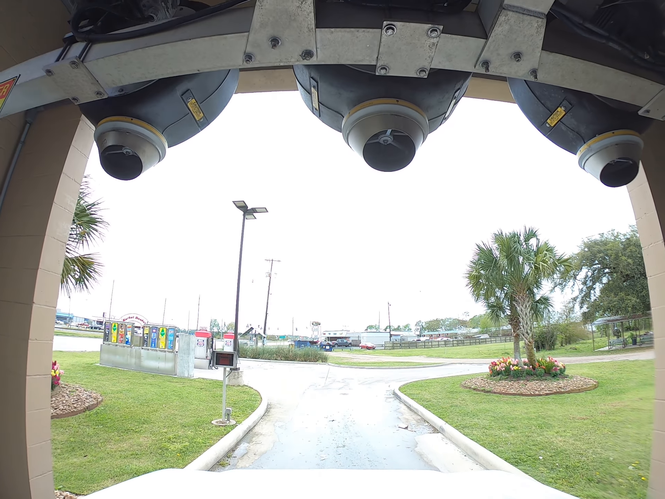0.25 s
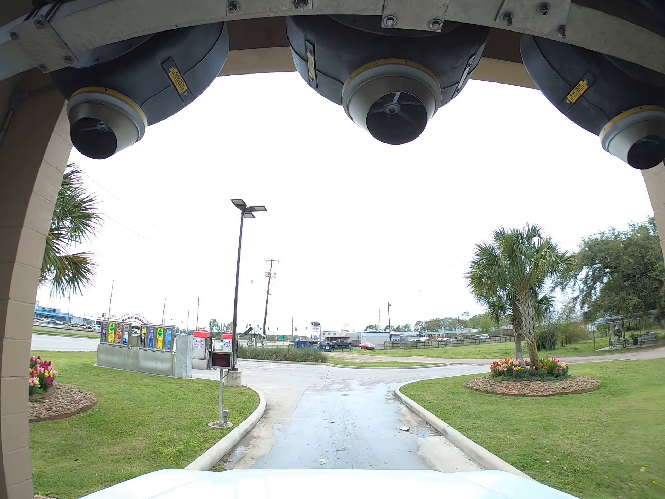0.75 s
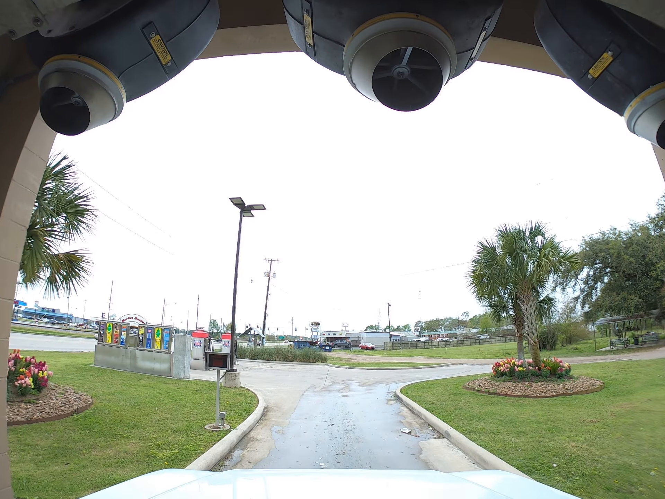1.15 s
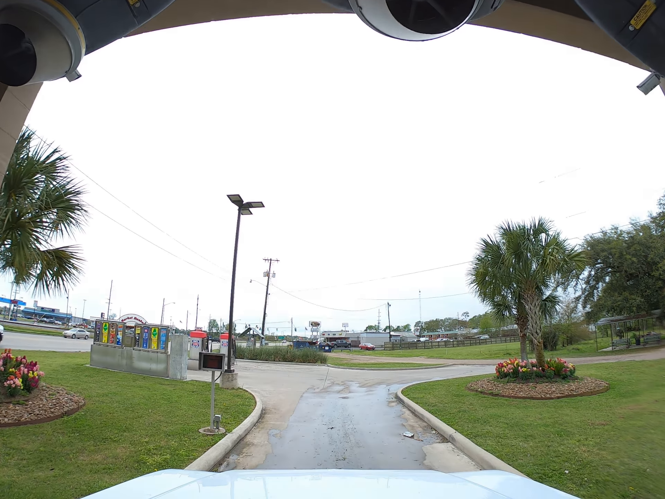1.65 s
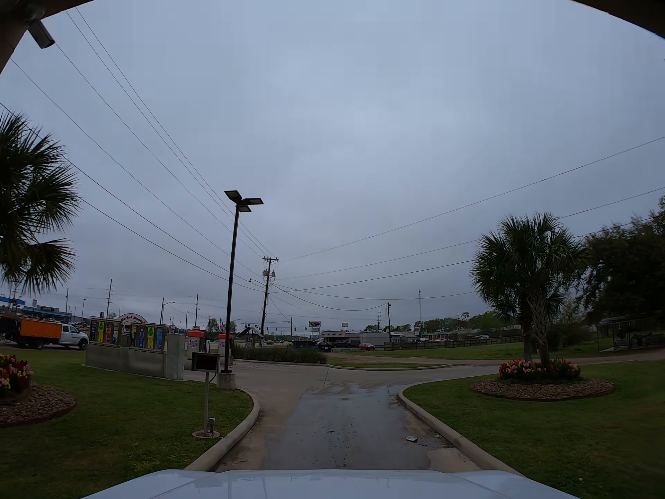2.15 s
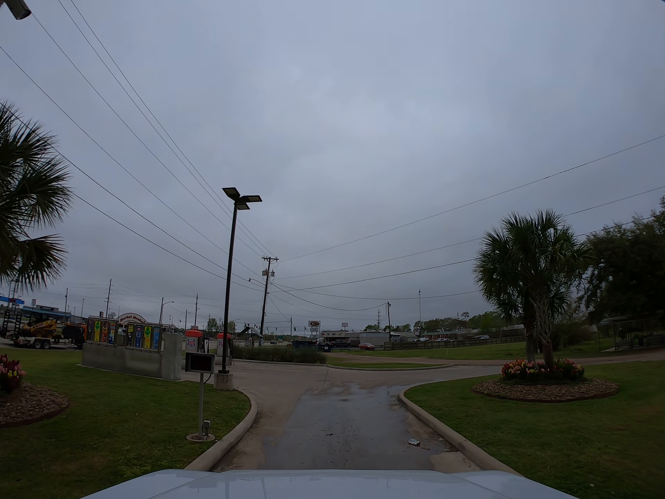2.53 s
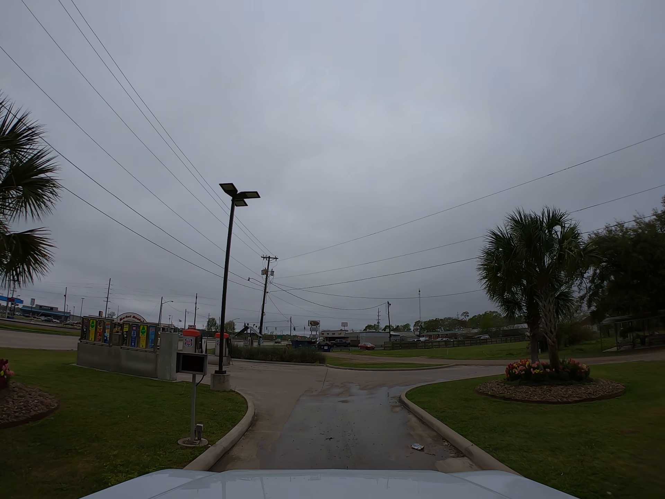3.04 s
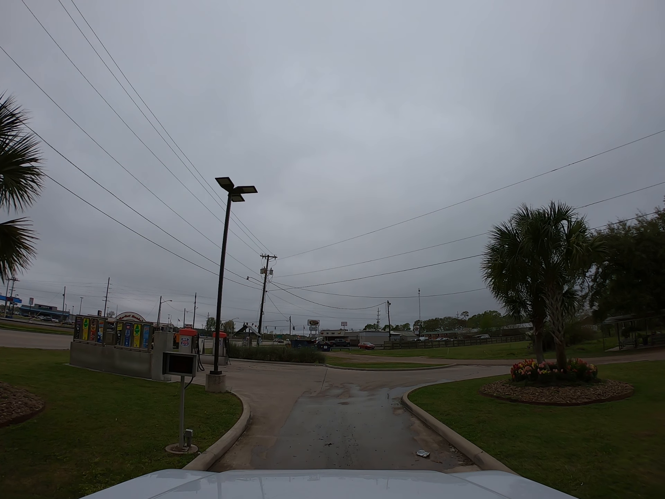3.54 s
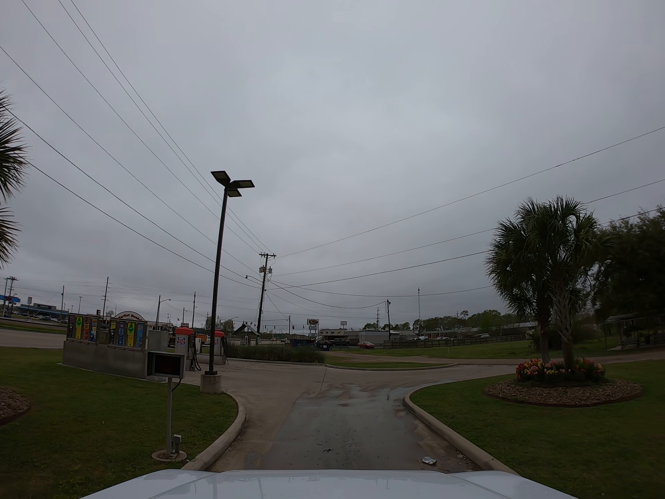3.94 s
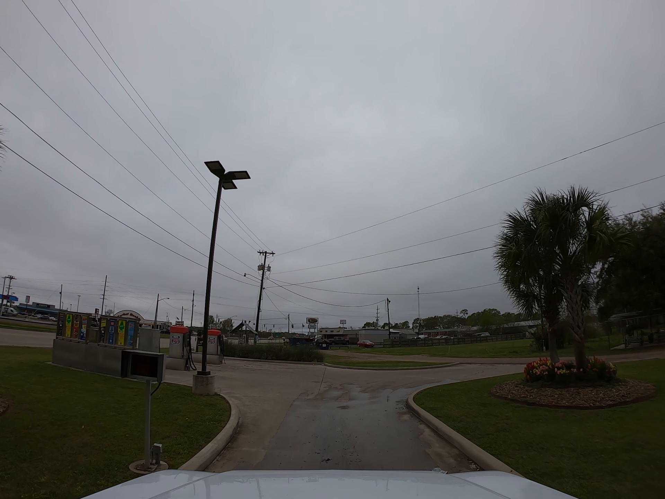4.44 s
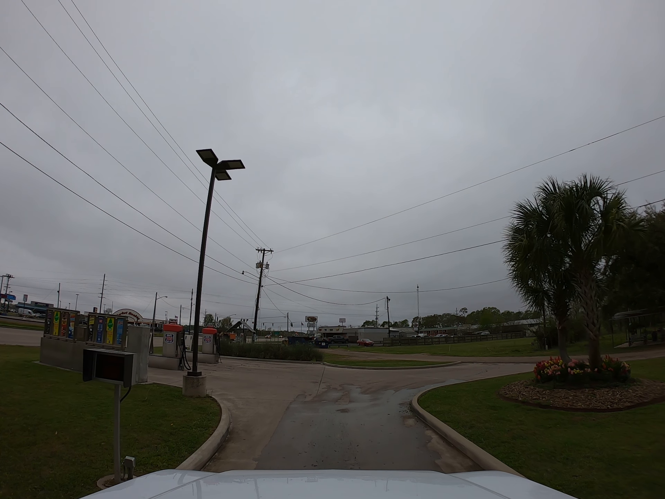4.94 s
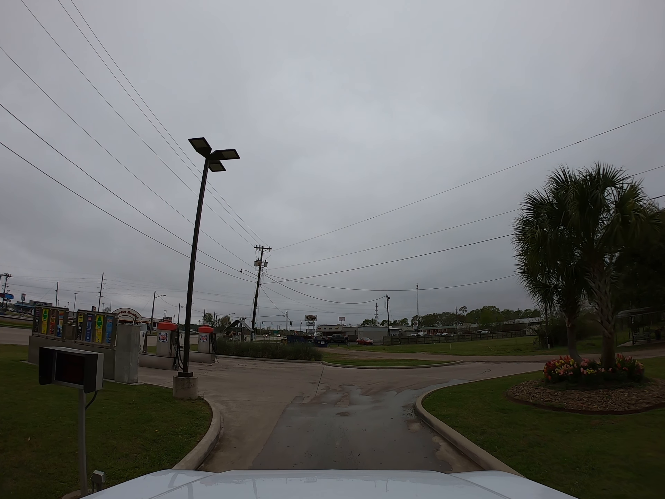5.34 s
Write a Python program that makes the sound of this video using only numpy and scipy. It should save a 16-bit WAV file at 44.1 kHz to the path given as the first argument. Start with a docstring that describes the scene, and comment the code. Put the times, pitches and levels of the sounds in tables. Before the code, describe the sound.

A car rolls slowly out from under car wash blowers, with the microphone in the cabin. Fluttering air beats on the roof and whines, surges once, then gradually dies down. Three soft knocks sound through the body, the last two during a low blower hum that rises and falls. Drops tick on the glass throughout, over the idling engine and the body's rumble, which are left as the air recedes.

```python
"""One microphone inside a car, close to the glass, rolling slowly out from under a car wash's air blowers.
At first the turbulent jets drum on the roof just overhead and rush past the windows, whining in narrow
resonances. A soft knock comes through the body at 1.5 s; near 2 s the rush surges as the car clears the
last jets, then grows duller. From 2.6 to 4 s a blower tone swells and fades, with two more knocks.
The idling engine, the body's rumble and drops ticking on the glass, there all along, remain at the end."""
import sys
import numpy as np
from scipy import signal
from scipy.fft import rfft, irfft, next_fast_len
from scipy.io import wavfile
from scipy.ndimage import uniform_filter1d, map_coordinates

SR = 44100
rng = np.random.default_rng(int(sys.argv[2]) if len(sys.argv) > 2 else 0)


def store_pcm(level_fs):
    """Save levels as 16-bit WAV."""
    pcm = np.round(np.clip(level_fs, -1, 1) * 32767).astype(np.int16)
    wavfile.write(sys.argv[1], SR, np.atleast_2d(pcm).T)


N = 246078

# Colours of the noises, low to high: (frequency [Hz], relative spectral density [dB])
RUMBLE_SPECTRUM = [(7.1, -45), (12, -14), (27, -4), (70, -4), (113, -3), (140, -13.5), (172, -16.5),
                   (217, -9.5), (260, -38), (340, -71), (570, -120)]
BOOM_SPECTRUM = [(90, -41), (125, -4), (155, 2), (190, 2), (222, -5), (250, -7.5), (300, -42)]
DRUMMING_SPECTRUM = [(190, -32), (250, 1.5), (300, 2.5), (360, -4.5), (415, 0), (500, -10.5), (700, -34.5)]
RUSH_SPECTRUM = [(350, -43.5), (480, -3.5), (620, -5.5), (760, -3), (880, -1.5), (1000, -2.5),
                 (1150, -12.5), (1500, -48)]
UPPER_RUSH_SPECTRUM = [(850, -26), (1080, -2.5), (1260, -2), (1450, -8), (1700, -15.5), (2100, -48)]
HISS_SPECTRUM = [(1400, -32), (1750, 1.5), (2080, 0.5), (2430, -6), (2960, -1.5), (3600, -7), (4200, -12.5),
                 (5000, -25), (6500, -54.5)]
FIZZ_SPECTRUM = [(3800, -25), (4600, -4.5), (5400, -7), (6300, -4), (7000, 0), (7900, -5.5), (9900, -8),
                 (10700, -15), (12300, -18.5), (13300, -29.5), (14400, -32.5), (16000, -44)]
MIC_HISS_SPECTRUM = [(11500, -25), (13000, -6), (14300, 0), (16000, 0)]
# The same noises over time, before flutter and surge: (time [s], level [dB])
RUMBLE_LEVEL = [(0, -30), (.6, -27), (1.2, -30.5), (1.83, -33.5), (2.4, -33.5), (3.2, -30), (3.7, -29),
                (4.2, -27.5), (4.6, -30), (5.1, -32), (5.4, -26.5), (5.58, -26.5)]
BOOM_LEVEL = [(0, -30.5), (.2, -23), (1.44, -23.5), (1.57, -30.5), (2.4, -30), (2.65, -29), (2.9, -32),
              (3.2, -31), (3.45, -27.5), (3.85, -35.5), (4.8, -36), (5.1, -32), (5.58, -34)]
DRUMMING_LEVEL = [(0, -27), (1.4, -30.5), (1.6, -34), (2.4, -35), (3.1, -38), (3.7, -41.5), (4.05, -42.5),
                  (4.4, -40), (4.9, -43), (5.58, -40.5)]
RUSH_LEVEL = [(0, -29), (1.1, -29.5), (1.5, -32), (2.45, -34.5), (2.9, -37), (3.6, -41.5), (4.05, -42),
              (4.4, -39.5), (4.9, -41), (5.58, -42)]
UPPER_RUSH_LEVEL = [(0, -40), (1, -42.5), (1.6, -43.5), (2.2, -43), (2.6, -47), (3.4, -48.5), (4.3, -48),
                    (5, -47.5), (5.58, -50)]
HISS_LEVEL = [(0.0, -48.5), (1.13, -51), (2.02, -50.5), (2.5, -52.5), (3.39, -56), (4.4, -58.5),
              (5.58, -61.5)]
FIZZ_LEVEL = [(0.0, -61), (2.04, -61), (2.24, -63), (3.88, -63.5), (5.58, -70.5)]
MIC_HISS_LEVEL = [(.6, -97.5), (1.1, -92), (1.6, -98), (2.6, -98), (3.2, -85.5), (3.8, -88.5), (4.3, -79),
                  (5.35, -80), (5.58, -95.5)]
# The engine's firing tone and the blower tone, heard from the cabin: (time [s], level [dB])
FIRING_LEVEL = [(0, -42.5), (1.1, -33.5), (1.75, -40), (2.6, -36), (4.2, -34.5), (4.7, -32.5),
                (5.42, -32.5), (5.58, -42)]
BLOWER_LEVEL = [(0, -32), (1.4, -47), (2.2, -36), (2.52, -37.5), (2.6, -25), (2.8, -29), (2.95, -31),
                (3.1, -31.5), (3.25, -25.5), (3.45, -24), (3.6, -28.5), (3.8, -28.5), (3.95, -44.5),
                (5.58, -36.5)]
# Thin sizzles and rough squeaks: (time [s], half length [s], level [dB], centre [Hz], width [Hz])
SIZZLES = [(5.22, 0.083, -66, 3000, 500), (4.7, 0.8, -63.5, 2010, 300), (3.022, .008, -49.5, 1900, 200),
           (3.04, .013, -47.5, 2170, 260), (3.085, 0.021, -56, 2150, 200), (5.152, 0.0067, -53, 2900, 900)]
# Drops, before their colouring: # (time [s], level [dB], pitch [Hz], bright part [dB re tick], pane ring [dB re
# tick])
DROPS = [(.123, -34, 4200, -2, -7), (.176, -31.5, 3000, -15, -9), (.497, -35, 3800, -12, -8),
         (.839, -29.5, 3000, -1, -9), (1.479, -35, 3950, -10, -7), (1.5554, -30.5, 3470, -25, -13),
         (1.6642, -28.5, 2850, -2, -4), (1.948, -31.5, 3500, -9, -10), (2.1435, -41, 4520, 7, -9),
         (2.1876, -40, 4430, 8.5, -7), (2.37, -35, 3150, -20, -11), (2.6794, -38, 2885, -23, -13),
         (3.3519, -31.5, 2560, -6, -8), (3.5823, -29.5, 2920, -24, -12), (3.6544, -40, 2220, -23, -6),
         (3.804, -35, 2850, -8, -12), (3.9779, -26.5, 2870, -6, -18), (4.244, -39, 2000, -25, 1),
         (4.322, -43, 2700, -25, -9), (4.388, -41, 2700, -25, -12), (4.396, -44, 3200, -23, -12),
         (4.588, -39, 3200, -20, -12), (4.789, -41, 3800, -17, -12), (4.898, -35.5, 1800, -28, -2),
         (4.9676, -31.5, 2400, -23, -4), (5.022, -46, 2900, -14, -3), (5.1411, -24, 2550, -16, -3),
         (5.1492, -34, 2900, -6, -6), (5.2844, -42, 3000, -20, -12), (5.296, -41, 3000, -25, -12),
         (5.369, -45, 3000, -8, -9), (5.385, -45, 2500, -25, -9), (5.467, -39, 2400, -8, -1),
         (5.4897, -32.5, 2570, -30, -12), (5.5503, -36, 2800, -20, -5), (5.556, -45, 3200, -2, -12)]
# Colour of a drop as heard in the cabin: (frequency [Hz], gain [dB])
DROP_COLOUR = [(500, 2.5), (3900, -1), (4700, -9.5), (5400, -5), (6500, -1), (7500, -6), (9000, -7),
               (16000, -3)]
# Knocks on the body: (time [s], level [dB], pitch [Hz], ring [cycles], thud [dB re blow], thud pitch [Hz])
KNOCKS = [(1.4545, -11, 720, 1, -6, 370), (2.667, -14, 440, 0.94, -4, 205),
          (3.559, -19.5, 585, 0.6, -1.5, 295)]
# Strength of the jets that drive the whines: (time [s], level [dB])
JET_STRENGTH = [(0.0, -26), (0.9, -28.5), (1.4, -32.5), (1.86, -32), (2.42, -34.5), (3.67, -39),
                (4.37, -41.5), (5.25, -45), (5.58, -38.5)]
# Resonances in the rush: (centre [Hz], level at mean jet strength [dB], slope [dB per dB of strength])
WHINES = [(220.4, -40.5, 1.01), (735.4, -50.5, 1), (853, -51.5, 1.4), (930, -49.5, 1.15)]
# Moments when one whine stands out: (row of WHINES, time [s], half length [s], rise [dB])
WHINE_SWELLS = [(0, 0.52, 0.1, 1), (0, 1.39, 0.14, 11), (0, 3.3, 0.73, 3.5), (1, 1.163, 0.055, 17),
                (1, 2.8, 0.42, 7), (2, 1.68, 0.2, 7.5), (2, 2.4, 0.15, 14), (3, 1.01, 0.06, 10),
                (3, 2.04, 0.05, 13), (2, 2.09, 0.066, 11), (1, 2.02, .08, 6), (3, 1.83, .06, 8),
                (3, 3.2, 0.21, 10.5), (3, 4.0, 0.23, 12)]


def amp(db):
    """Gain of a level in dB."""
    return 10 ** (np.asarray(db) / 20)


def unit(x):
    """Scaled to rms 1."""
    return x / np.sqrt(np.mean(x ** 2) + 1e-20)


def curve(rows):
    """A (time, level) table as one level per sample."""
    return np.interp(np.arange(N) / SR, *np.transpose(rows))


def wobble(rate):
    """A smooth random curve, rate knots a second."""
    return map_coordinates(rng.standard_normal(int(N * rate / SR) + 4), [np.arange(N) * rate / SR])


def bump(at_s, half_s):
    """A bell of height 1 in time."""
    return np.exp(-((np.arange(N) / SR - at_s) / half_s) ** 2)


def filtered(x, response):
    """x through a gain that depends on frequency."""
    size = next_fast_len(N + 8192)
    return irfft(rfft(x, size) * response(np.fft.rfftfreq(size, 1 / SR)), size)[..., :N]


def coloured(x, spectrum, outside_db=None):
    """x through a (frequency, gain) table, read on a log frequency axis."""
    f, db = np.transpose(spectrum)
    return filtered(x, lambda hz: amp(np.interp(np.log(hz + 1), np.log(f + 1), db, outside_db, outside_db)))


def noise(spectrum, patchy_db):
    """Coloured noise of rms 1 with patches of random gain in time and frequency."""
    cells = signal.stft(rng.standard_normal(N), nperseg=512)[2]
    patches = uniform_filter1d(rng.standard_normal(cells.shape), size=5, axis=0)
    patches = unit(uniform_filter1d(patches, size=10, axis=1))
    patchy = signal.istft(cells * amp(patchy_db * patches), nperseg=512)[1][:N]
    return unit(coloured(patchy, spectrum, outside_db=-120))


def tone(hz, db, phase_drift):
    """A sine of rms level db whose phase wanders."""
    return np.sqrt(2) * amp(db) * np.sin(2 * np.pi * hz * np.arange(N) / SR + phase_drift)


def blip(t, hz, cycles):
    """A struck thing that rings for only a few cycles, with a soft start."""
    age = t * hz / cycles
    return age ** 2 * np.exp(2 - 2 * age) * np.sin(2 * np.pi * hz * t)


def mic_hiss():
    """The microphone's own faint, very high hiss."""
    return amp(curve(MIC_HISS_LEVEL)) * noise(MIC_HISS_SPECTRUM, patchy_db=0.5)


def rumble():
    """Low rumble through the car's body."""
    return amp(curve(RUMBLE_LEVEL) + 0.8 * wobble(5.5)) * noise(RUMBLE_SPECTRUM, patchy_db=0.5)


def engine(firing_hz=32.6, octave_db=-1):
    """The idling engine, heard from the cabin: its firing rate and the octave drift together."""
    level_db = curve(FIRING_LEVEL)
    drift = 0.19 * wobble(3.7)
    octave = tone(2 * firing_hz, level_db + octave_db + 3 * wobble(2.7), 2 * drift + 0.93 * wobble(12))
    return tone(firing_hz, level_db + 1.7 * wobble(1.44), drift) + octave


def blower(pitch_hz=168.5):
    """A blower outside the car: one tone that wavers in level and phase."""
    return tone(pitch_hz, curve(BLOWER_LEVEL) + 0.66 * wobble(7), 0.22 * wobble(9))


def sizzles():
    """Faint, narrow bands of hiss that come and go."""
    out = np.zeros(N)
    for at_s, half_s, db, centre_hz, width_hz in SIZZLES:
        band = filtered(rng.standard_normal(N), lambda hz: np.exp(-2 * ((hz - centre_hz) / width_hz) ** 2))
        out += amp(db) * bump(at_s, half_s) * unit(band)
    return out


def drops(pane_hz=1576, patter_per_s=12, softest_db=-53, patter_hz=3000):
    """Water on the glass close by: each drop ticks and rings the pane; small ones patter at random."""
    out, t = np.zeros(N + SR), np.arange(SR // 50) / SR
    patter = [(when * N / SR, softest_db + 8 * force, patter_hz * 2 ** (0.73 * (pitch - 0.5)), -18, -10)
              for when, force, pitch in rng.random((round(patter_per_s * N / SR), 3))]
    for at_s, db, hz, bright_db, pane_db in DROPS + patter:
        tick = blip(t, hz, cycles=0.81)
        bright = amp(bright_db) * blip(t, rng.normal(6400, 250), cycles=0.74)
        pane = amp(pane_db) * blip(t, pane_hz, cycles=2.1)
        out[round(at_s * SR):][:len(t)] += amp(db) * (tick + bright + pane)
    return coloured(out[:N], DROP_COLOUR)


def knocks():
    """Soft knocks through the body: a short pitched blow and the body's low answering thud."""
    out, t = np.zeros(N + SR), np.arange(SR // 20) / SR
    for at_s, db, hz, cycles, thud_db, thud_hz in KNOCKS:
        thud = amp(thud_db) * blip(t, thud_hz, cycles=1.07)
        out[round(at_s * SR):][:len(t)] += amp(db) * (blip(t, hz, cycles) + thud)
    return out[:N]


def whines(width_hz=26, wander_ratio=12 / 900):
    """Air noise ringing in narrow resonances: fuzzy, drifting lines that follow the jets and swell."""
    out, strength_db = np.zeros(N), curve(JET_STRENGTH)
    for row, (centre_hz, db, slope) in enumerate(WHINES):
        driven_db = db + slope * (strength_db - strength_db.mean())
        swell_db = sum(rise * bump(at_s, half_s) for which, at_s, half_s, rise in WHINE_SWELLS
                       if which == row)
        fuzz = filtered(rng.standard_normal((2, N)), lambda hz: 1 / (1 + (2 * hz / width_hz) ** 2))
        phase = 2 * np.pi * np.cumsum(centre_hz * (1 + wander_ratio * wobble(8))) / SR
        ring = fuzz[0] * np.sin(phase) + fuzz[1] * np.cos(phase)  # slow noise shifted up to the pitch
        out += amp(driven_db + swell_db) * unit(ring)
    return out


def jets():
    """Turbulent air on the roof just overhead and along the glass: one flutter shakes all its bands."""
    surge_db = 2 * bump(at_s=2.085, half_s=0.15)  # the car clears the last jets
    flutter = wobble(12)
    buffet_db = flutter + 0.6 * wobble(25)
    boom = amp(curve(BOOM_LEVEL) + buffet_db) * noise(BOOM_SPECTRUM, patchy_db=0.4)
    drumming = amp(curve(DRUMMING_LEVEL) + buffet_db) * noise(DRUMMING_SPECTRUM, patchy_db=0.56)
    rush = amp(curve(RUSH_LEVEL) + surge_db + 0.88 * flutter) * noise(RUSH_SPECTRUM, patchy_db=1.14)
    upper_db = curve(UPPER_RUSH_LEVEL) + surge_db + 0.26 * flutter
    upper_rush = amp(upper_db) * noise(UPPER_RUSH_SPECTRUM, patchy_db=1.05)
    grain_db = 0.29 * flutter + 0.32 * wobble(30)
    hiss = amp(curve(HISS_LEVEL) + 0.56 * surge_db + grain_db) * noise(HISS_SPECTRUM, patchy_db=0.67)
    fizz = amp(curve(FIZZ_LEVEL) + 0.64 * grain_db) * noise(FIZZ_SPECTRUM, patchy_db=1.3)
    return boom + drumming + rush + upper_rush + hiss + fizz


def scene():
    """One spot inside the car, plus the microphone's own hiss, in mono."""
    sustained = jets() + whines() + blower() + engine() + rumble() + mic_hiss()
    return (sustained + drops() + knocks() + sizzles())[None]


def record(dry):
    """The microphone in the cabin keeps nothing above its band limit."""
    return filtered(dry, lambda hz: hz < 15750)


dry = scene()
out = record(dry)
store_pcm(out)
```